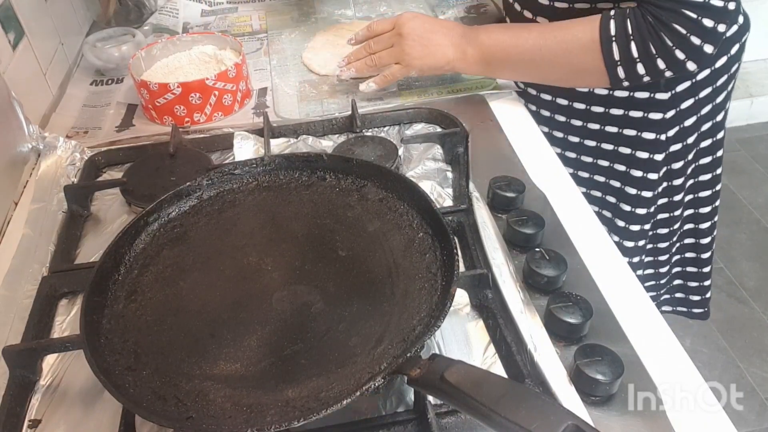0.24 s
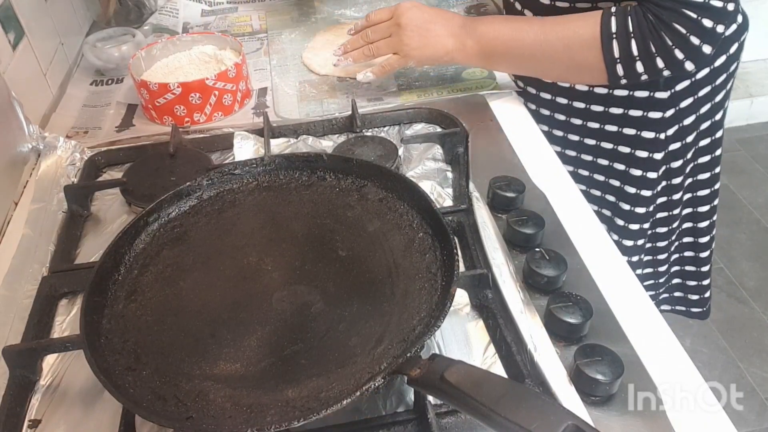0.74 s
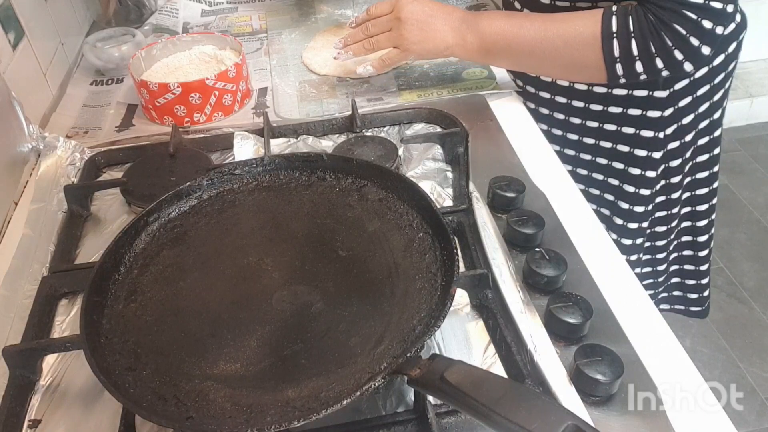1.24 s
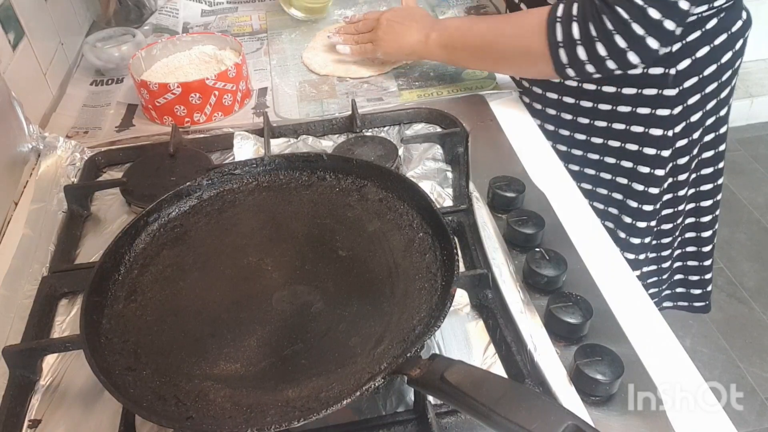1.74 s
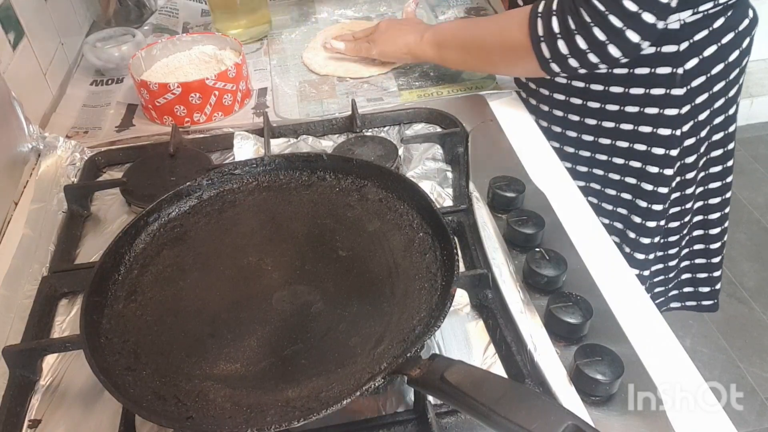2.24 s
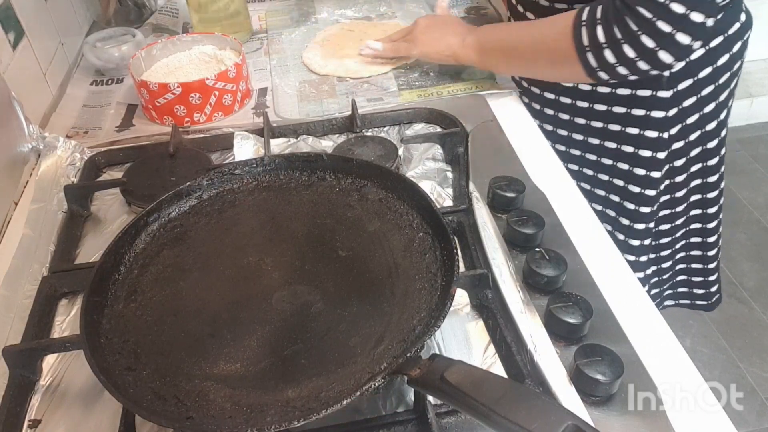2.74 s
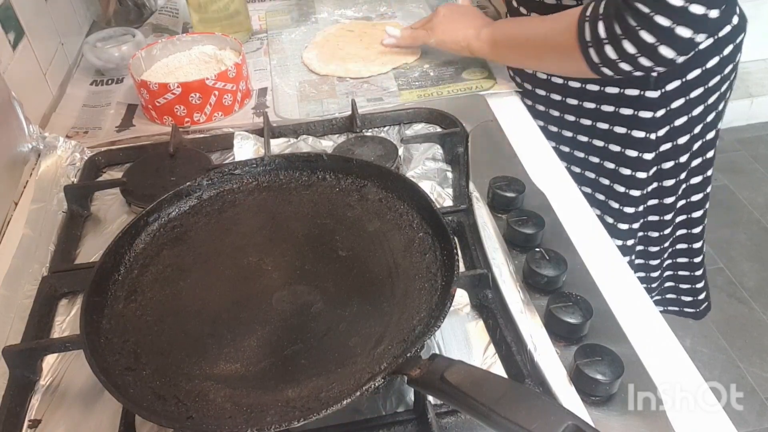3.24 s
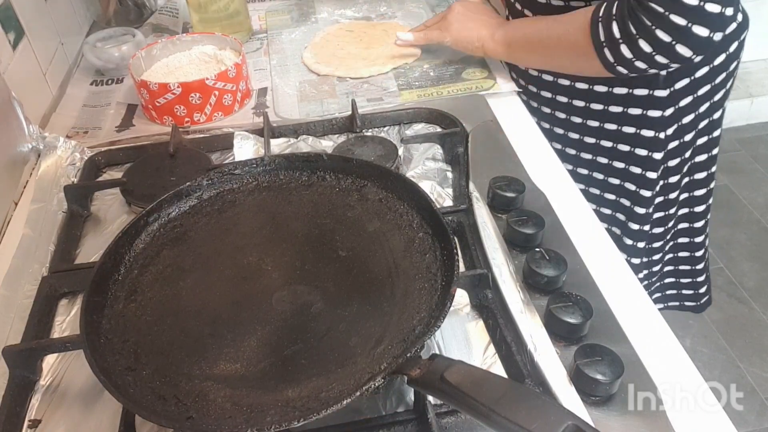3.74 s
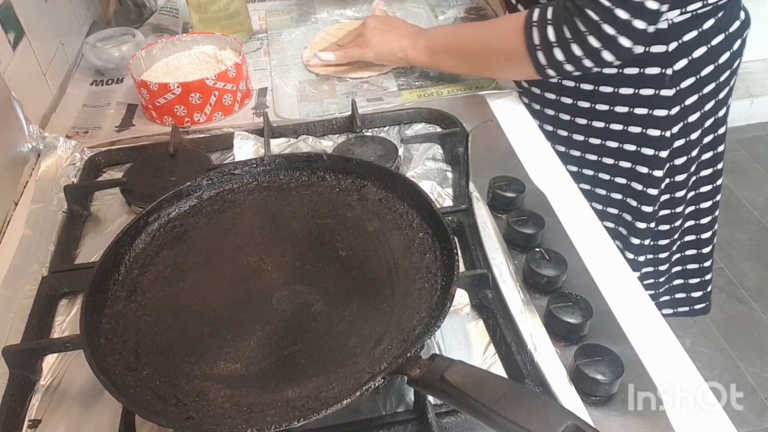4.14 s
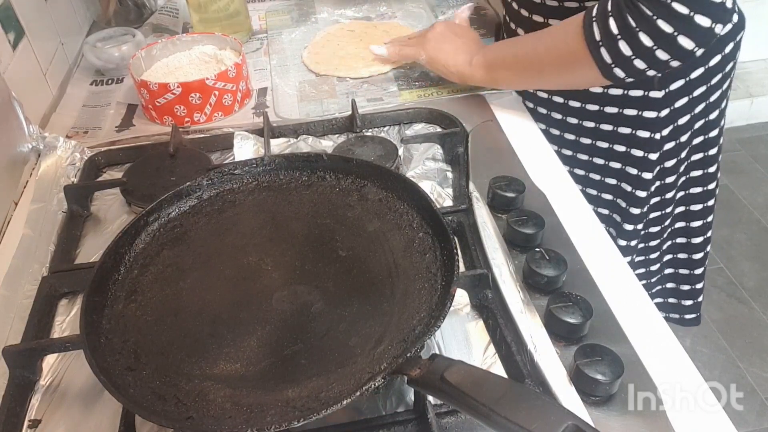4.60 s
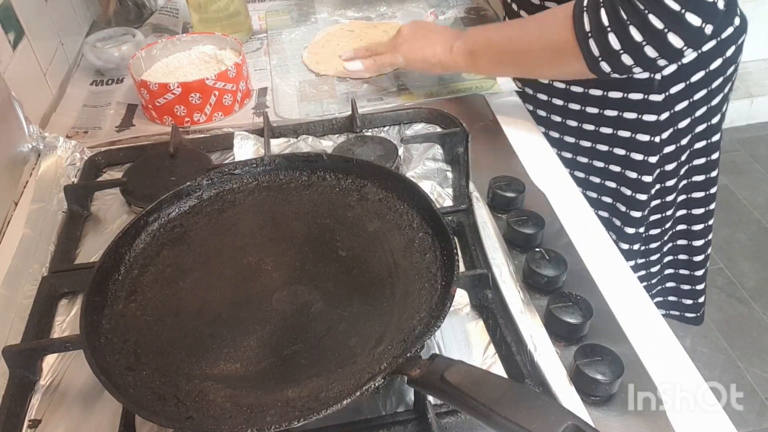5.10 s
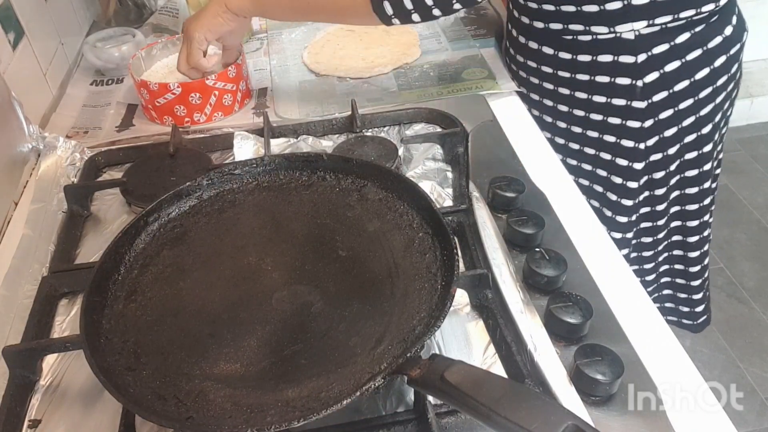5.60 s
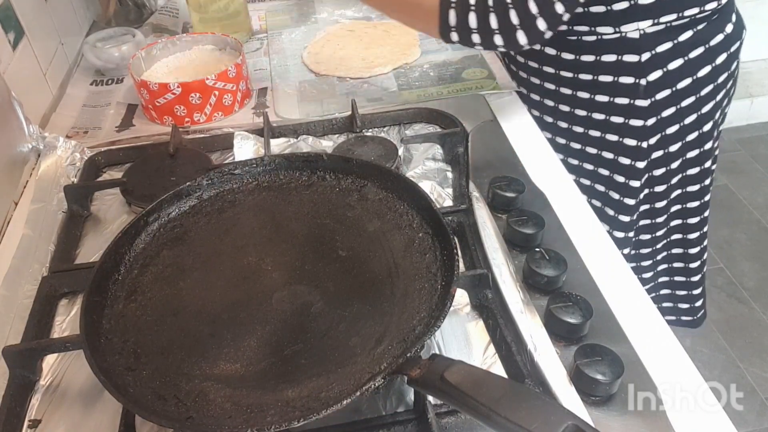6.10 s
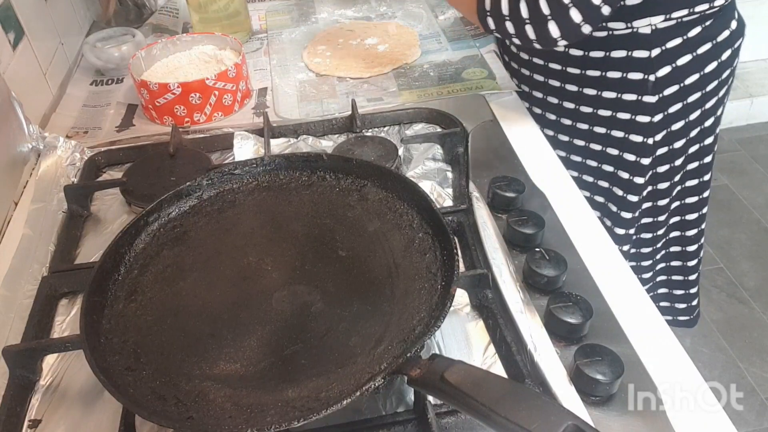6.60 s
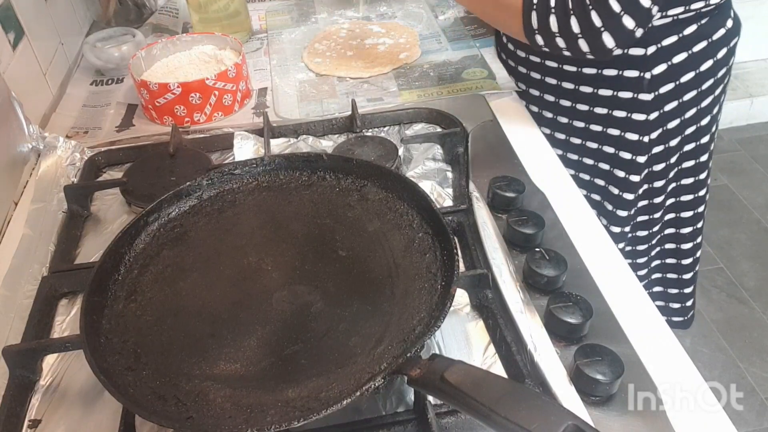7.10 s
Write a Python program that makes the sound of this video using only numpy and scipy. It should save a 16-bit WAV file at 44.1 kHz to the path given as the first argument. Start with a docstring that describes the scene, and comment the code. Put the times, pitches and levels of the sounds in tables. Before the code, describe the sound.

Close up in a slightly reverberant kitchen, dough is pressed flat on a plastic sheet. The creases give sharp, irregular ticks and crackles from start to finish, over faint floury rubbing from the fingers. At about 2 seconds an object is set down on the counter with a loud, dull thump, scrapes briefly along it and rocks to rest with a few smaller bumps. A sharp plastic snap and a faint clink follow at around 2.5 seconds. The crackling goes on, with another strong snap at 4.3 seconds, a soft bump at 4.7 and a busier cluster just after 6. Through the walls, a low engine drone rises in pitch from about 2.3 seconds and fades by 6, while a second, fainter engine comes in around 5 seconds and lasts to the end, just past 7. A low electrical hum and a soft steady rush lie underneath throughout.

```python
"""Pressing dough in a kitchen

Close up, dough is pressed flat on a plastic sheet, whose creases tick and crackle under the fingers.
Something is set down on the counter with a thump, scrapes along it and rocks to rest.
Farther off, engines drone through the walls, rising in pitch, over mains hum and a soft steady rush."""
import sys
import numpy as np
from scipy import signal
from scipy.fft import rfft, irfft
from scipy.io import wavfile

SR = 44100
rng = np.random.default_rng(int(sys.argv[2]) if len(sys.argv) > 2 else 0)


def wav_record(signal):
    """Record a signal, one row per channel, as 16-bit PCM in the file named by sys.argv[1]."""
    frames = np.transpose(np.atleast_2d(signal))
    bounded = np.clip(frames, -1, 1)
    # unit amplitude maps onto the largest positive 16-bit level
    quanta = np.round(bounded * 32767).astype(np.int16)
    wavfile.write(sys.argv[1], SR, quanta)


N = 324135


def from_db(db):
    """Decibels to gain."""
    return 10 ** (np.asarray(db) / 20)


def unit_rms(x):
    """Scale to unit rms."""
    return x / np.sqrt(np.mean(x ** 2) + 1e-20)


def unit_energy(x):
    """Scale each channel to unit energy."""
    return x / np.sqrt(np.sum(x ** 2, axis=-1, keepdims=True) + 1e-20)


def curves(rows):
    """Join timed rows with straight lines: one curve for each column after the time."""
    times, *columns = np.transpose(rows)
    return [np.interp(np.arange(N) / SR, times, column) for column in columns]


def at_hz(points, hz):
    """Read a table on a log-frequency axis."""
    freqs, values = np.transpose(points)
    return np.interp(np.log(np.maximum(hz, 1)), np.log(freqs), values)


def pan(left_db):
    """Gains that make a source left_db louder at the left microphone than at the right."""
    return from_db(np.array([[left_db], [-left_db]]) / 2)


def drift(per_s):
    """A random wander of rms 1 that turns per_s times a second."""
    knots = rng.standard_normal(4096)
    return unit_rms(np.interp(np.arange(N) / SR * per_s, np.arange(len(knots)), knots))


def convolve(x, response):
    """Pass a sound through a mono or stereo response."""
    return signal.fftconvolve(np.atleast_2d(x), np.atleast_2d(response), axes=-1)[:, :N]


def colour(x, spectrum, size=8192):
    """Shape a sound with a causal (minimum-phase) filter of unit energy."""
    gains = from_db(at_hz(spectrum, np.fft.rfftfreq(size, 1 / SR)))
    cepstrum = irfft(np.log(gains))
    cepstrum[1:size // 2] *= 2
    cepstrum[size // 2 + 1:] = 0
    response = irfft(np.exp(rfft(cepstrum)))
    return convolve(x, unit_energy(response))


def stereo_noise(shared):
    """White noise with a share of its power common to both microphones."""
    return np.sqrt(shared) * rng.standard_normal(N) + np.sqrt(1 - shared) * rng.standard_normal((2, N))


def ring(clicks, hz, t60):
    """A unit click sets a sine of height 1 ringing."""
    decay, angle = from_db(-60 / (t60 * SR)), 2 * np.pi * hz / SR
    return signal.lfilter([0, np.sin(angle)], [1, -2 * decay * np.cos(angle), decay ** 2], clicks + 1e-18)


def strike(times, levels_db, modes):
    """Blows at the given times ring a set of modes."""
    clicks = np.zeros(N)
    clicks[np.round(np.asarray(times) * SR).astype(int)] = from_db(levels_db)
    return sum(ring(clicks, hz, t60) * from_db(db) for hz, db, t60 in modes)


def resonate(x, modes):
    """Drive a set of resonances; rms 1."""
    total = 0
    for hz, width, db in modes:
        band = signal.lfilter(*signal.iirpeak(hz, hz / width, fs=SR), x)
        total = total + from_db(db) * unit_rms(band)
    return unit_rms(total)


def grains(per_s, spread_db):
    """Random tiny slips of uneven size; rms 1."""
    sizes = from_db(spread_db * np.minimum(rng.exponential(1, N), 3))
    slipping = rng.random(N) < per_s / SR
    return unit_rms(slipping * sizes * rng.choice([-1, 1], N))


def scatter(x, spread_s, size=400):
    """Close surfaces smear a sound briefly, differently for each microphone."""
    decay = np.exp(-np.arange(size) / SR / spread_s)
    return convolve(x, unit_energy(decay * rng.standard_normal((2, size))))


def cracks(times, levels_db, crack_s, flutter_s, flutter_db, size=3000, lag_samples=7):
    """Each contact is a sharp crack, reaching the left microphone first, with a diffuse flutter."""
    out, t = np.zeros((2, N + size)), np.arange(size) / SR
    for time, db in zip(times, levels_db):
        start = max(round(time * SR), 0)
        crack = unit_energy(np.exp(-t / crack_s) * rng.standard_normal(size))
        flutter = unit_energy(np.exp(-t / flutter_s) * rng.standard_normal((2, size)))
        direct = np.array([crack, np.pad(crack, (lag_samples, 0))[:size]])
        out[:, start:start + size] += from_db(db) * unit_energy(direct + from_db(flutter_db) * flutter)
    return out[:, :N]


def strokes(rows, attack_s, release_s):
    """Gain of a series of movements: each builds up, holds and dies away."""
    t, gain = np.arange(N) / SR, 0
    for start, length, db in rows:
        rise = np.clip((t - start) / attack_s, 0, 1)
        fall = np.exp(-np.maximum(t - start - length, 0) / release_s)
        gain = gain + from_db(db) * rise * fall
    return gain


# The kitchen's reverberation (frequency [Hz], t60 [s])
KITCHEN_DECAY = [(150, 0.36), (1000, 0.48), (4000, 0.45), (8000, 0.21), (15000, 0.38)]

def in_kitchen(direct, reverb_db):
    """The direct sound plus diffuse reflections that build up quickly and die soonest near 8 kHz."""
    t, response = np.arange(int(0.7 * SR)) / SR, 0
    edges_hz = np.geomspace(150, 17000, 9)
    for low, high in zip(edges_hz, edges_hz[1:]):
        bandpass = signal.butter(2, [low, high], "band", fs=SR, output="sos")
        band = signal.sosfilt(bandpass, rng.standard_normal((2, len(t))))
        t60 = at_hz(KITCHEN_DECAY, np.sqrt(low * high))
        response = response + band * from_db(-60 * t / t60)
    build_up = 1 - np.exp(-t / 0.00043)
    return direct + from_db(reverb_db) * convolve(direct, unit_energy(response * build_up))


# Spectra of the room tone: far rumble, rush and hiss (frequency [Hz], relative level [dB])
RUMBLE_SPECTRUM = [(20, -50), (40, 0), (60, -7.5), (112, 0), (140, -11.5), (220, -18), (330, -26.5),
                   (600, -29.5), (1500, -47), (4000, -70)]
RUSH_SPECTRUM = [(100, -40), (260, -8), (340, -7.5), (440, -3), (520, -7), (620, -1), (840, -8.5),
                 (880, -13), (930, -23.5), (1300, -29), (3000, -63.5)]
HISS_SPECTRUM = [(700, 2), (1200, -2.5), (1550, -6), (2150, -2), (2550, 7.5), (2900, 6.5), (3050, -5),
                 (4200, -3.5), (5600, -21.5), (7500, 3.5), (9000, -12), (13000, 0), (16000, -7)]
# Hollow resonances in the rush (frequency [Hz], width [Hz], relative level [dB])
RUSH_RESONANCES = [(293, 2.1, -6), (444, 5.4, -13.5), (643.6, 32, -2.5), (709, 10, -15.5), (753, 6.9, -2),
                   (795, 25, -13), (820, 36, -0.5)]

def room_tone(mains_hz=51.6, mains_db=-58):
    """Mains hum, distant rumble, a steady hollow rush and thin hiss, all a little to the left."""
    mains = np.sqrt(2) * from_db(mains_db) * np.sin(2 * np.pi * mains_hz * np.arange(N) / SR)
    rumble = from_db(-53.5) * colour(stereo_noise(shared=1.0), RUMBLE_SPECTRUM)
    air = colour(stereo_noise(shared=0.69), RUSH_SPECTRUM)
    rush = from_db(-66.5) * air + from_db(-64) * resonate(air, RUSH_RESONANCES)
    hiss = from_db(-65) * colour(stereo_noise(shared=0.017), HISS_SPECTRUM)
    return (mains + rumble) * pan(4.4) + rush * pan(2.8) + hiss * pan(4.8)


# Beyond the walls, the nearer engine idles, pulls away, eases off once and fades
# (time [s], firing rate [Hz], fundamental level [dB], octave level [dB])
NEAR_ENGINE_RUN = [(0.0, 53.4, -39.5, -61.5), (0.5, 57.07, -55.5, -43), (0.8, 60.35, -47.5, -53.5),
                   (2.15, 60.08, -47.5, -52), (2.45, 66.2, -38.5, -58), (2.8, 67.75, -34.5, -64),
                   (3.08, 62.75, -41.5, -70), (3.3, 69.5, -34, -59), (3.56, 76, -43, -67),
                   (3.76, 85.44, -33.5, -82), (4.12, 90.04, -41, -85), (4.6, 102.7, -36.5, -73),
                   (5.35, 115.4, -42, -79), (5.55, 125, -50.5, -69.5), (6.1, 136.6, -69, -75)]
# Resonances of the walls and windows between the near engine and the kitchen, swelling as its fundamental
# passes (frequency [Hz], width [Hz], gain [dB])
WALL_RESONANCES = [(67.6, 5.8, -1), (71.3, 4.5, -5), (78.5, 1.1, -0.5), (89.46, 3.35, -4), (96.15, 1.6, -9),
                   (103.56, 3.2, -4), (110.2, 0.67, -13), (116.4, 6, -6)]
# Farther off, a second engine arrives and changes gear (time [s], firing rate [Hz], level [dB])
FAR_ENGINE_RUN = [(4.8, 66.5, -68), (5.1, 71.8, -58), (5.9, 84, -61), (6.22, 86.3, -50), (6.35, 77.4, -57),
                  (6.55, 75.5, -48), (7.05, 77.8, -76), (7.19, 88.3, -53.5), (7.33, 84.8, -44.5)]

def engines():
    """Only the lowest exhaust orders come through the walls, wavering slightly."""
    hz, fundamental_db, octave_db = curves(NEAR_ENGINE_RUN)
    wavering_hz = hz * (1 + 0.0053 * drift(per_s=23))
    phase = 2 * np.pi * np.cumsum(wavering_hz) / SR
    walls = sum(from_db(db) / (1 + 2j * (hz - mode_hz) / width) for mode_hz, width, db in WALL_RESONANCES)
    near = np.abs(walls) * from_db(fundamental_db) * np.sin(phase) + from_db(octave_db) * np.sin(2 * phase)
    far_hz, far_db = curves(FAR_ENGINE_RUN)
    fade_in = np.clip((np.arange(N) / SR - 4.6) / 0.3, 0, 1)
    far = fade_in * from_db(far_db) * np.sin(2 * np.pi * np.cumsum(far_hz) / SR)
    return np.sqrt(2) * (near + far) * from_db(drift(per_s=5)) * pan(4.0)


# Blows on the counter, left of centre (time [s], boom level [dB], knock level [dB])
COUNTER_BLOWS = [(1.957, -13.5, -28), (1.975, -58, -35), (2.094, -25, -37), (2.254, -21, -42),
                 (2.292, -22, -55), (2.338, -24.5, -64), (2.384, -34, -62), (4.690, -29.5, -70)]
# The counter's modes (frequency [Hz], gain [dB], t60 [s])
COUNTER_MODES = [(87.5, -12, 0.095), (108, 0, 0.37), (138, 0.5, 0.1), (160.9, -3.5, 0.28),
                 (200, -24.5, 0.17), (310, -44.5, 0.24), (416, -15.5, 0.067), (760, -18, 0.06),
                 (907, -21, 0.086), (1003, -58, 0.1), (1304, -26, 0.18)]
# Spectrum of the dull knock (frequency [Hz], relative level [dB])
KNOCK_SPECTRUM = [(100, 0), (250, 3), (420, 8.5), (650, -3), (1000, 2.5), (1500, -19), (2200, -28),
                  (3200, -27), (8000, -34)]

def counter_thumps(split_hz=260):
    """Blows set the counter's low modes booming; hard ones ring the upper modes and add a dull knock."""
    times, boom_db, knock_db = np.transpose(COUNTER_BLOWS)
    boom = strike(times, boom_db, [mode for mode in COUNTER_MODES if mode[0] < split_hz])
    boom = signal.sosfilt(signal.butter(2, 380, fs=SR, output="sos"), boom)
    ringing = strike(times, knock_db, [mode for mode in COUNTER_MODES if mode[0] >= split_hz])
    contact = cracks(times, knock_db, crack_s=0.009, flutter_s=0.0081, flutter_db=-3)[0]
    knock = colour(contact, KNOCK_SPECTRUM)
    blows = from_db(-7.5) * boom + from_db(9.5) * ringing + from_db(25) * knock
    blows = signal.sosfilt(signal.butter(2, 65, "high", fs=SR, output="sos"), blows)
    return in_kitchen(blows * pan(4.6), reverb_db=-7.5)


# On the counter the object catches twice, slides, creeps to rest (start [s], length [s], level [dB])
SLIDE_MOVES = [(2.089, 0.014, -34), (2.118, 0.009, -28.5), (2.141, 0.1, -30), (2.29, 0.11, -57)]
# Spectrum of its scrape (frequency [Hz], relative level [dB])
SCRAPE_SPECTRUM = [(90, -27), (150, 2.5), (210, -1.5), (280, -20.5), (480, -10), (1000, -9), (1450, -12),
                   (2300, -12), (3100, -9.5), (4200, -12), (5200, -18), (6500, -21), (9000, -27),
                   (13000, -28), (16000, -42)]
# Its resonances (frequency [Hz], width [Hz], relative level [dB])
OBJECT_RESONANCES = [(432, 45, 1.5), (567, 71, 2), (756, 77, 6), (950, 56, 0.5), (1060, 27, -23),
                     (1600, 17, -10), (1670, 9.5, -11), (2954, 41, -1), (3114, 62, 6.5), (3170, 96, -8),
                     (4030, 160, -16), (5650, 74, 4), (6020, 47, -4)]
# A light clink after the slide (time [s], level [dB])
CLINK_HIT = [(2.556, -50.5)]
# The modes of that clink (frequency [Hz], gain [dB], t60 [s])
CLINK_RING = [(2360, -6.5, 0.27), (4947, 2, 0.21), (5030, -4, .17), (6557, 4, 0.1)]

def sliding_object(chatter_hz=75):
    """The object sticks and slips in an uneven chatter that shakes its resonances; a clink follows."""
    push = strokes(SLIDE_MOVES, attack_s=0.0049, release_s=0.011)
    slip_cycle = np.cumsum(chatter_hz * from_db(3 * drift(per_s=60))) / SR % 1
    force = push * unit_rms(from_db(-9 * slip_cycle))  # each slip starts hard and falls by 9 dB
    slips = force * grains(per_s=5400, spread_db=-0.3)
    smeared = 0.69 * slips + 0.54 * scatter(slips, spread_s=0.0053)
    body = np.std(slips) * resonate(force * stereo_noise(shared=0.85), OBJECT_RESONANCES)
    scrape = from_db(1) * colour(smeared, SCRAPE_SPECTRUM) + from_db(-6) * body
    clink = strike(*np.transpose(CLINK_HIT), CLINK_RING)
    return in_kitchen((scrape + clink) * pan(2.4), reverb_db=-6)


# Close to the microphones, the hand pushes the dough over the sheet (start [s], length [s], level [dB])
HAND_PRESSES = [(0.0, 0.19, -58), (0.239, 0.1206, -60.5), (0.4, 0.18, -61.5), (0.932, 0.4, -64),
                (1.63, 0.18, -60), (2.09, 0.39, -48.5), (3.43, 0.55, -59.5), (4.05, 0.23, -61.5),
                (4.579, 0.13, -58), (4.797, 0.088, -58), (5.13, 0.49, -63.5), (6.15, 0.073, -53.5),
                (6.27, 0.14, -62.5), (6.59, 0.059, -57.5), (7.137, 0.086, -62)]

def hand_pressure():
    """How hard the hand bears down on the dough, as a gain at every sample."""
    return strokes(HAND_PRESSES, attack_s=0.013, release_s=0.034)


# Spectrum of the rubbing, heard close (frequency [Hz], relative level [dB])
RUB_SPECTRUM = [(900, -13.5), (1500, -12), (3000, -18.5), (5500, 0), (7500, -5), (12500, -2.5),
                (16000, -18.5)]
# Fingertips catching on the sheet (time [s], level [dB], centre [Hz], width [Hz], half-length [s])
FINGERTIP_CATCHES = [(1.066, -64.5, 1710, 1098, 0.025), (1.716, -59, 3870, 3000, 0.03),
                     (3.478, -57.5, 3580, 450.6, 0.0082), (3.671, -56, 4300, 2800, 0.011),
                     (3.96, -64, 2263, 2420, 0.033), (6.76, -64, 1280, 400.2, 0.0097)]

def fingers(resting_db=-62.5):
    """Rubbing frees many faint ticks from the floury film; now and then a fingertip catches."""
    effort = np.hypot(hand_pressure(), from_db(resting_db))  # the hand never lies quite still
    ticks = scatter(grains(per_s=800, spread_db=4.5), spread_s=0.0006)
    friction = stereo_noise(shared=0.15) * from_db(5.5 * drift(per_s=45))
    rubbing = from_db(-3) * effort * colour(ticks + from_db(-7) * friction, RUB_SPECTRUM)
    t = np.arange(N) / SR
    for time, db, hz, width, half_length in FINGERTIP_CATCHES:
        band = [(hz, width, 0)]
        slips = resonate(resonate(grains(per_s=3000, spread_db=2), band), band)
        swell = np.exp(-((t - time) / half_length) ** 2)
        rubbing = rubbing + from_db(db) * swell * slips
    return in_kitchen(rubbing, reverb_db=-5)


# Average small crease (crack level [dB], body level [dB], treble level [dB])
SMALL_CREASE_DB = (-46, -61, -62.5)

def small_creases(firm_per_s=45, firm_press_db=-56.5, spread_db=4, candidates=400):
    """Small creases give way at random, far more often under a firm press; rows of time and levels."""
    times, chance = rng.random((2, candidates)) * [[(N - 1) / SR], [1]]
    levels_db = np.array(SMALL_CREASE_DB) + spread_db * rng.standard_normal((candidates, 3))
    pressure = hand_pressure()[(times * SR).astype(int)]
    firmness = np.minimum(pressure / from_db(firm_press_db), 1) ** 4
    gives_way = chance < firm_per_s * firmness * N / SR / candidates
    return np.column_stack([times, levels_db])[gives_way]


# The sheet's loudest snaps, close up (time [s], crack level [dB], body level [dB], treble level [dB])
LOUD_CREASES = [(0.0695, -40, -76, -49), (0.1112, -36, -56.5, -40), (0.2505, -36.5, -51.5, -40.5),
                (0.2675, -40, -67, -48), (0.309, -37.5, -64, -42), (0.348, -43, -67, -45),
                (0.397, -49, -66, -45), (0.5653, -51, -63, -47), (0.5931, -43, -48, -40.5),
                (0.6963, -56, -62, -44.5), (1.284, -40, -59, -47), (1.3132, -37, -62, -41.5),
                (1.3843, -37, -61, -37), (1.7622, -39, -61, -47), (2.0323, -44, -50, -45.5),
                (2.0694, -34, -45.5, -40), (2.4719, -35, -48, -37.5), (2.4791, -19, -36.5, -35),
                (2.7262, -37.5, -60, -67), (2.818, -41, -50.5, -44), (2.9143, -34.5, -44.5, -45.5),
                (2.9743, -37, -49.5, -67), (3.5244, -40, -69, -46.5), (3.8516, -40, -52, -40.5),
                (3.9413, -32, -46.5, -44), (4.0694, -44, -61, -42), (4.0919, -31.5, -47.5, -38),
                (4.3128, -24.5, -45.5, -30.5), (4.4465, -34, -58, -42.5), (4.4581, -37, -54, -40.5),
                (4.5131, -32, -51, -47.5), (4.825, -40, -77, -43.5), (4.855, -49, -72.5, -45),
                (5.0457, -36, -61, -48.5), (5.1669, -41, -60, -48.5), (5.2694, -36.5, -76, -42.5),
                (5.4238, -47, -78, -44.5), (5.6382, -46.5, -76, -48.5), (5.8246, -40, -60, -45.5),
                (6.1584, -33.5, -47, -44), (6.1961, -36, -51.5, -55), (6.2103, -39, -64, -39),
                (6.2789, -38, -50.5, -45), (6.2964, -33.5, -54.5, -43), (6.3297, -33.5, -55.5, -45),
                (6.4884, -33, -56, -44), (6.6576, -47, -81.5, -46.5), (6.7291, -38.5, -67.5, -44),
                (6.8623, -36, -52, -53), (7.0686, -40, -53, -82), (7.2366, -33.5, -56, -52)]
# Spectra of a snap's body, crack and treble (frequency [Hz], relative level [dB])
BODY_SPECTRUM = [(500, -30), (1000, -16), (1500, -7), (2100, -5), (2800, 0), (3600, -5), (6000, -26)]
CRACK_SPECTRUM = [(1500, -42.5), (2800, -7), (4200, 0.5), (6000, 1.5), (7500, 1.5), (9500, -10),
                  (15000, -19)]
TREBLE_SPECTRUM = [(4000, -29), (7500, -9.5), (10500, 3.5), (13000, 3), (16000, -5)]

def plastic_sheet():
    """Creases flip with a sharp crack; larger patches of film add a lower, longer body."""
    times, crack_db, body_db, treble_db = np.vstack([LOUD_CREASES, small_creases()]).T
    flex = cracks(times, body_db, crack_s=0.001, flutter_s=0.007, flutter_db=3)
    flip = cracks(times, crack_db, crack_s=0.0005, flutter_s=0.0045, flutter_db=0.5)
    tick = cracks(times, treble_db, crack_s=0.00039, flutter_s=0.0035, flutter_db=2.5)
    body = from_db(23.5) * colour(flex, BODY_SPECTRUM) * pan(7.4)
    crack = from_db(16) * colour(flip, CRACK_SPECTRUM) * pan(0.14)
    treble = from_db(23.5) * colour(tick, TREBLE_SPECTRUM) * pan(2.7)
    return in_kitchen(body + crack + treble, reverb_db=-6)


def scene():
    """The kitchen as heard at the counter, from far to near."""
    return room_tone() + engines() + counter_thumps() + sliding_object() + fingers() + plastic_sheet()


def port_dip(x, hz, q, depth_db):
    """A broad cut from the cavity in front of a microphone."""
    angle = 2 * np.pi * hz / SR
    width, depth = np.sin(angle) / (2 * q), from_db(depth_db / 2)
    numerator = [1 + width * depth, -2 * np.cos(angle), 1 - width * depth]
    denominator = [1 + width / depth, -2 * np.cos(angle), 1 - width / depth]
    return signal.lfilter(numerator, denominator, x)


def record(dry):
    """A stereo pair: the right microphone is hollow around 9 kHz, and both cut off at 15.9 kHz."""
    left, right = dry
    right = port_dip(right, hz=8500, q=6.8, depth_db=-20)
    right = port_dip(right, hz=10300, q=2.6, depth_db=-15)
    lowpass = signal.ellip(10, 0.1, 80, 15900, fs=SR, output="sos")
    return signal.sosfilt(lowpass, np.array([left, right]))


dry = scene()
out = record(dry)
wav_record(out)
```